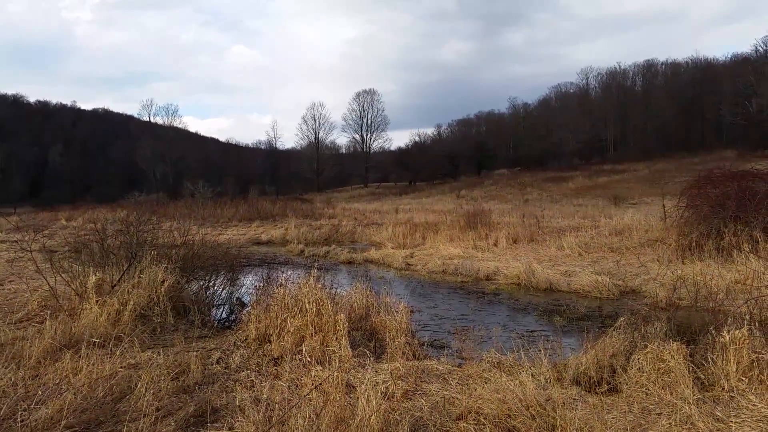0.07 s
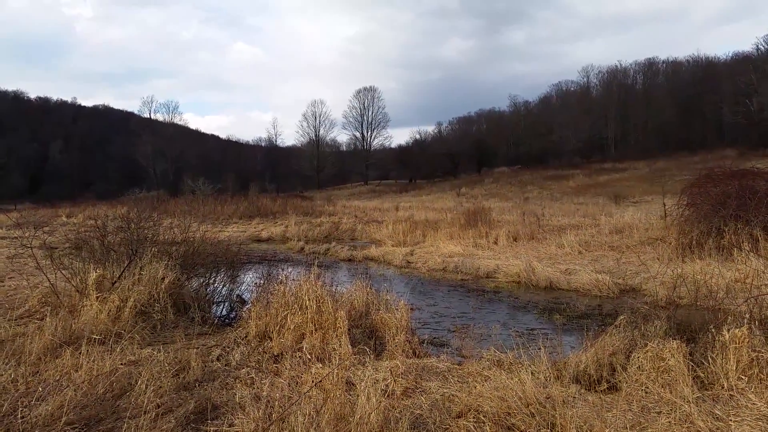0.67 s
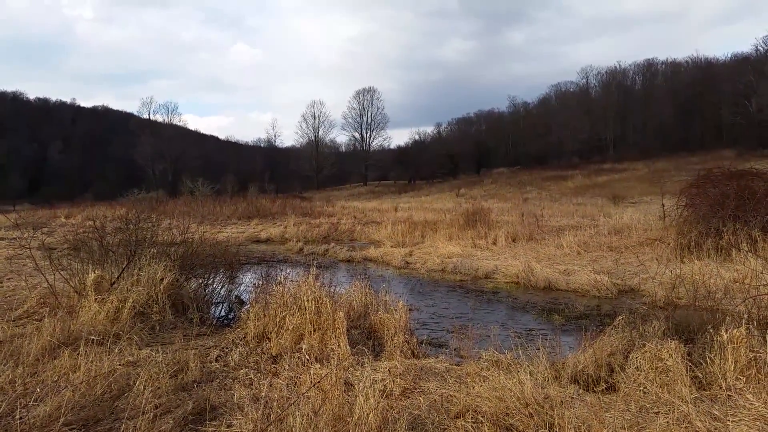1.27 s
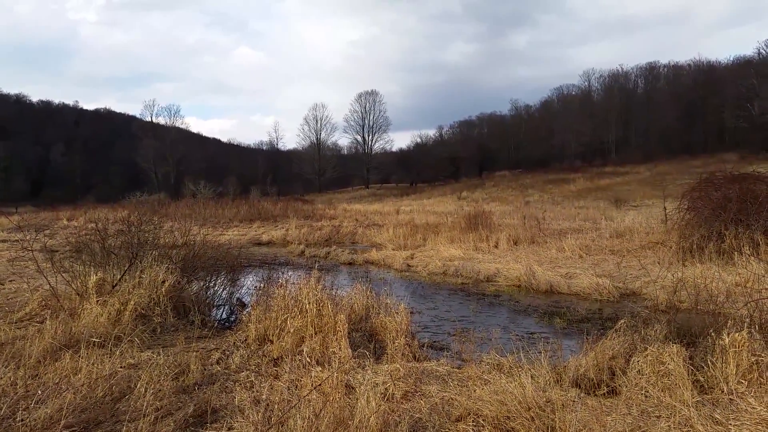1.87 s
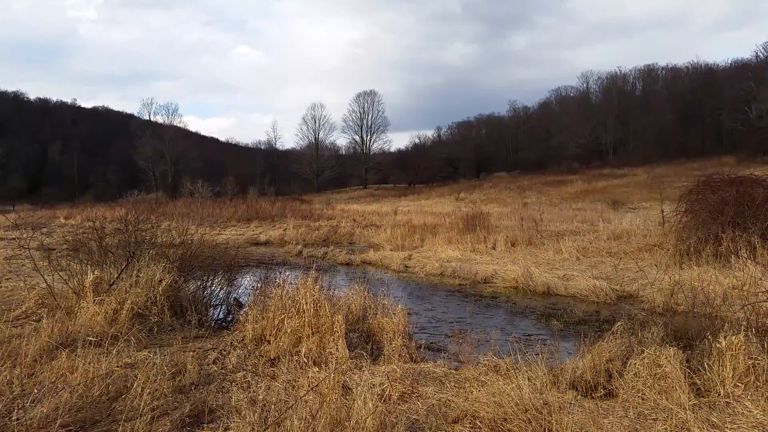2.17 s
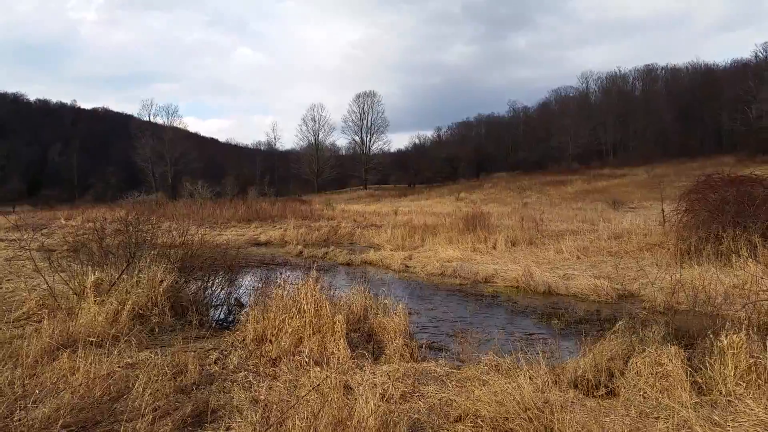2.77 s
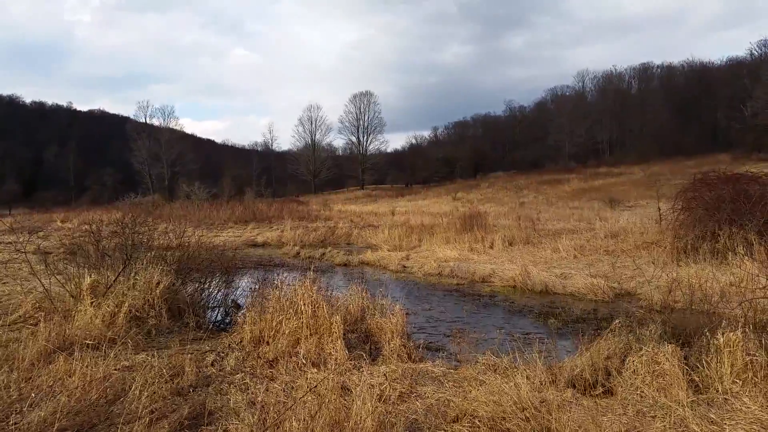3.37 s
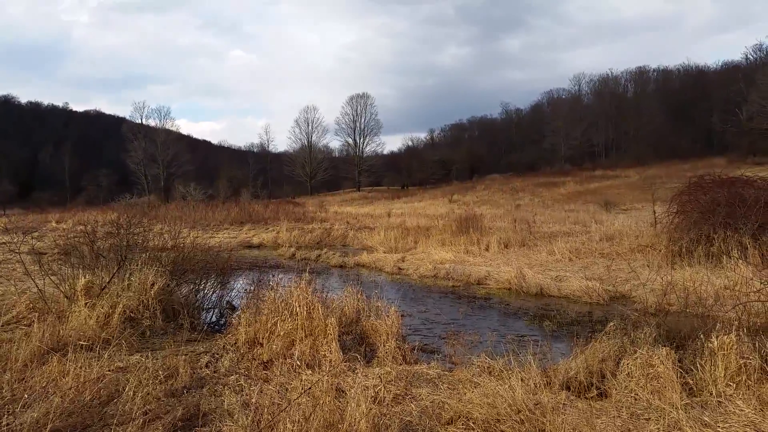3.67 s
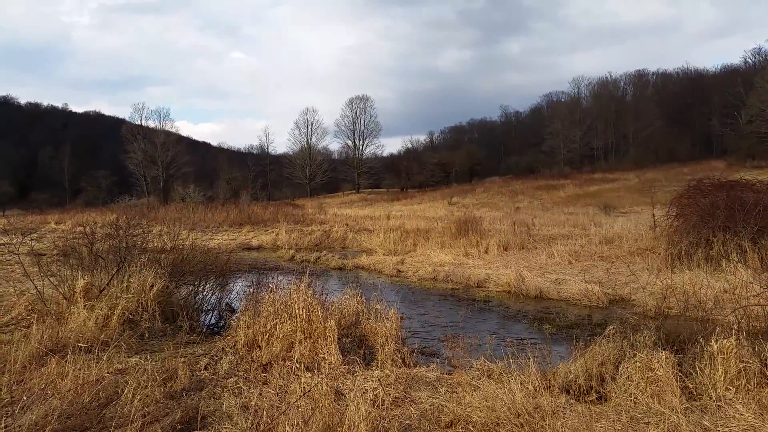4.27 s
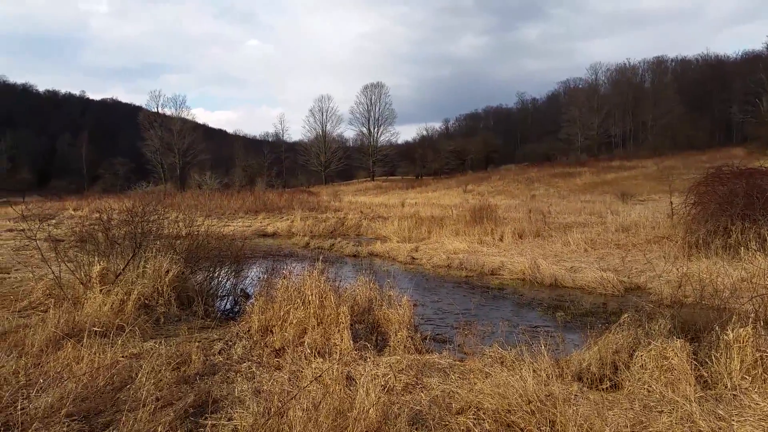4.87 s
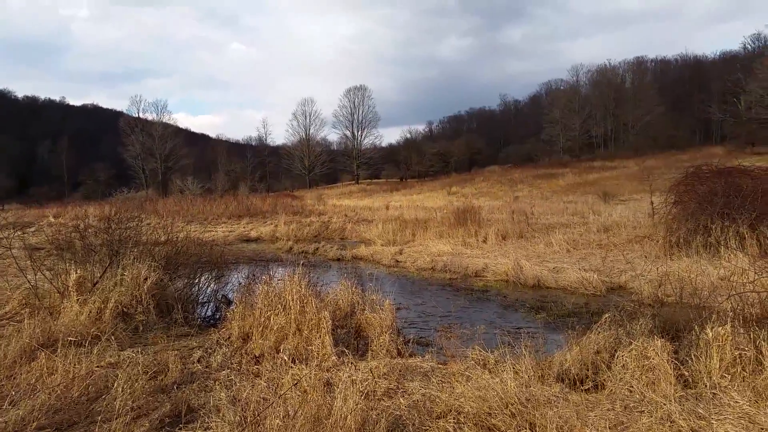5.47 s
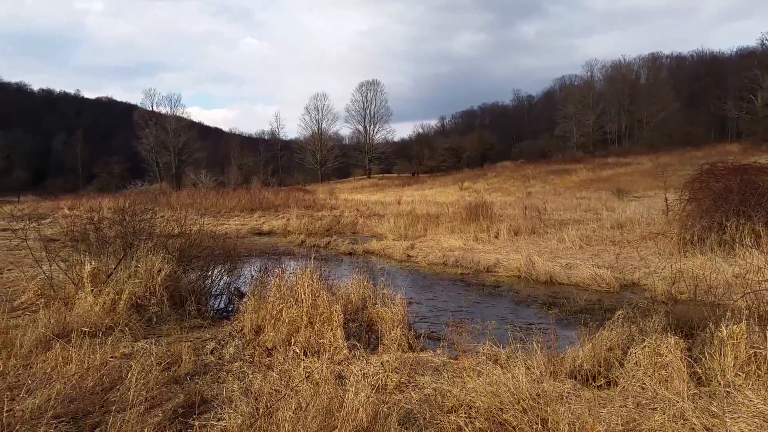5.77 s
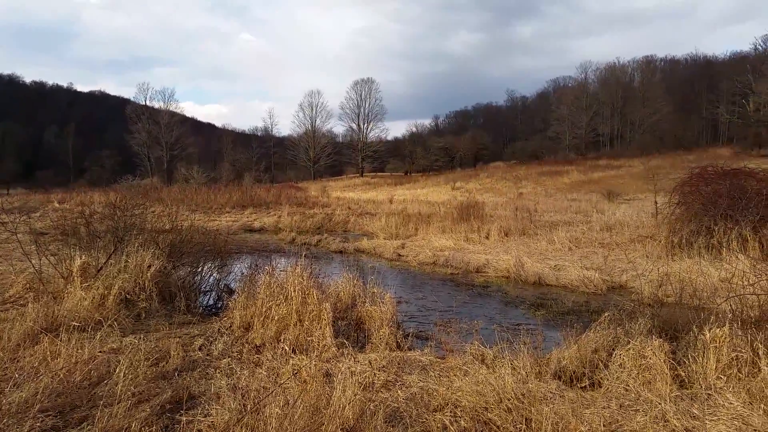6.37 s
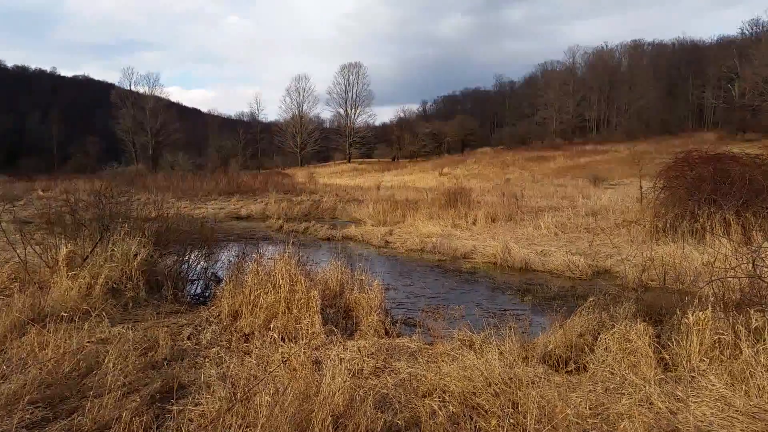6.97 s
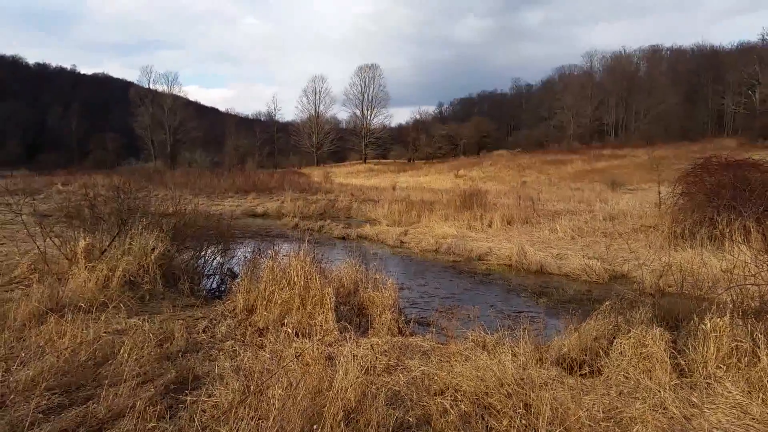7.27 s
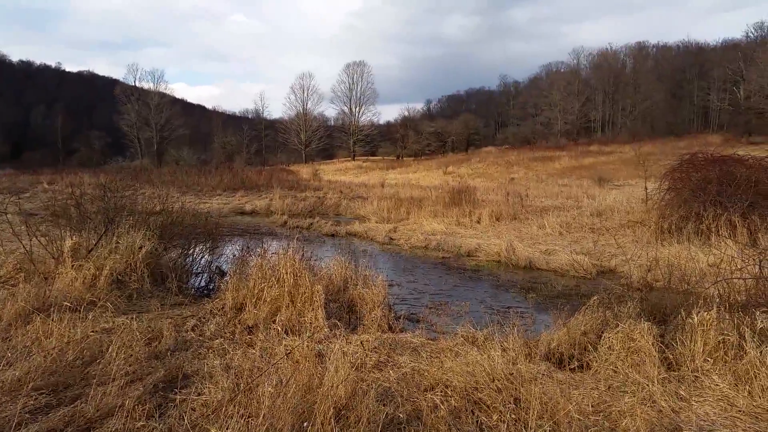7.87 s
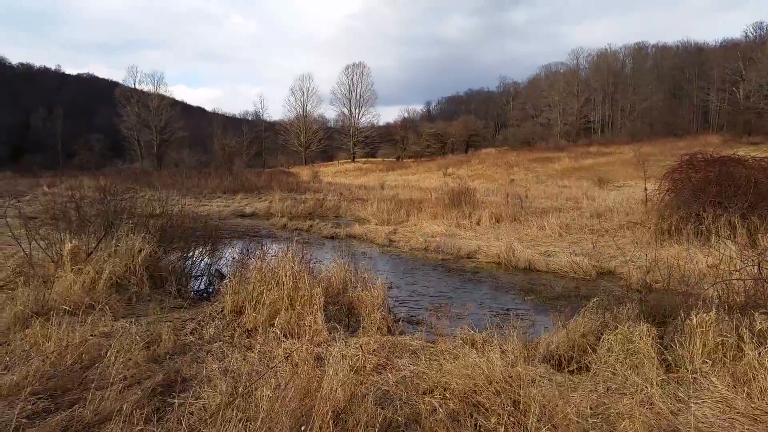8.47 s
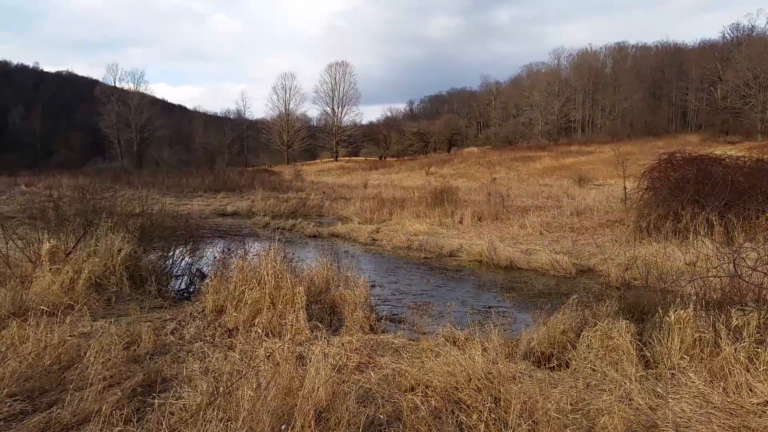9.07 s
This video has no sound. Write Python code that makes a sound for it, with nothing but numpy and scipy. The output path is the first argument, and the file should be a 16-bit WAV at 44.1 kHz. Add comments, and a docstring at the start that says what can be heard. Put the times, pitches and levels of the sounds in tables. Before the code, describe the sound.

Many small frogs call in short, high, rising whistles across a marsh while gusts of wind rumble on the microphone.

```python
"""A chorus of short rising whistles: spring peepers call around a marsh pond, near ones over a far blur.
Each peep is a larynx tone whose second harmonic is radiated by the resonant vocal sac.
One frog peeps lower than the rest, a few trill, and wood frogs quack faintly through throat resonances.
Turbulent wind rumbles on both microphones and buffets the right one; dry grass rustles and ticks."""
import sys
import numpy as np
from scipy import signal
from scipy.fft import rfft, irfft, next_fast_len
from scipy.io import wavfile
from scipy.ndimage import uniform_filter1d

SR = 44100
rng = np.random.default_rng(int(sys.argv[2]) if len(sys.argv) > 2 else 0)


def master(y):
    """Save y as 16-bit WAV."""
    cut = np.clip(np.atleast_2d(y).T, -1, 1)
    pcm = np.round(cut * 32767)  # scale
    wavfile.write(sys.argv[1], SR, pcm.astype(np.int16))


N = 407043
TIME = np.arange(N) / SR


def from_db(db):
    """Decibels to amplitude gain."""
    return 10 ** (np.asarray(db) / 20)


def rms_one(x):
    """Normalisation to an rms of 1."""
    return x / np.sqrt(np.mean(x ** 2) + 1e-20)


def add(out, start, sound):
    """Superposition: a sound joins out at a start time in seconds."""
    at = int(round(start * SR))
    first, last = max(at, 0), min(at + sound.shape[-1], N)
    if last > first:
        out[..., first:last] += sound[..., first - at:last - at]


def wander(rate, samples):
    """Random modulation of spread about 1, with rate new values a second."""
    steps = np.arange(samples) * rate / SR
    count = int(steps[-1]) + 2
    return np.interp(steps, np.arange(count), rng.standard_normal(count))


def pan(left_db):
    """Level difference, left minus right, at constant total power."""
    return rms_one(from_db([[left_db / 2], [-left_db / 2]]))


def noise(colour):
    """Spectral shaping of white noise, uncorrelated in the two channels; rms 1."""
    hz, db = np.transpose(colour)
    size = next_fast_len(N, True)
    gain = from_db(np.interp(np.log(np.fft.rfftfreq(size, 1 / SR) + 1), np.log(hz), db))
    white = rng.standard_normal((2, size))
    return rms_one(irfft(rfft(white) * gain, size)[:, :N])


def band(x, low_hz, high_hz):
    """Butterworth band-pass."""
    return signal.sosfilt(signal.butter(2, [low_hz, high_hz], "band", fs=SR, output="sos"), x)


def progress(length):
    """Normalised time, 0 to 1 through a call."""
    return np.linspace(0, 1, int(length * SR))


def swell(u, attack, release):
    """Envelope with a rounded rise and fall, given as shares of the call; rms 1."""
    ramp = np.clip(np.minimum(u / attack, (1 - u) / release), 0, 1)
    return rms_one(np.sin(np.pi / 2 * ramp))


def surges(rows, attack_s, release_s):
    """Incoherent sources add in power: the gain of events that rise, hold and die away."""
    power = np.zeros(N)
    for start, length, db in rows:
        away = np.maximum((start - TIME) / attack_s, (TIME - start - length) / release_s)
        power += (from_db(db) * np.exp(-np.clip(away, 0, 20))) ** 2
    return np.sqrt(power)


def marsh(x, t60_s, wet_db):
    """Reverberation: reeds and banks scatter sound into a short tail, different at each microphone."""
    t = TIME[:SR]
    tail = rng.standard_normal((2, SR)) * from_db(-60 * t / t60_s) * (t > .003)
    tail /= np.sqrt(np.sum(tail ** 2, axis=1, keepdims=True))
    return x + from_db(wet_db) * signal.fftconvolve(x, tail, axes=1)[:, :N]


def still_air():
    """The ambient noise floor: a steady broadband hush."""
    # spectrum of the hush: frequency_hz, density_db
    air_colour = [(30, 2.5), (300, 4), (600, 4), (1100, 1.5), (1800, -1), (3000, 6), (3500, -6), (4200, -3),
                  (5000, -20), (6400, -38), (8500, -37.5), (12000, -26.5), (16000, -21.5)]
    return from_db(-48) * noise(air_colour) * pan(left_db=2)


def snap(decay_s):
    """An impulsive source: a noise burst with exponential decay."""
    return rng.standard_normal((2, SR // 20)) * np.exp(-TIME[:SR // 20] / decay_s)


def grass():
    """Modulated noise and impulses: dry blades hiss in the breeze and rustle, stems crack and tick."""
    # swishes in the breeze: start_s, length_s, level_db
    swishes = [(4.45, 1.07, -68.5), (6.12, 0.18, -62), (7.07, 0.074, -69), (7.75, 0.3, -70)]
    # their spectrum: frequency_hz, density_db
    grass_colour = [(30, -21.5), (3000, -12.5), (6500, -6), (8500, 3), (12000, 2), (16000, -5)]
    stir = np.hypot(from_db(-72), surges(swishes, attack_s=.04, release_s=.05))
    hiss = stir * noise(grass_colour) * from_db(1.2 * wander(250, N))
    # rustles close on the left: start_s, length_s, level_db
    rustles = [(6.66, 0.028, -45), (6.76, 0.037, -44.5), (7.02, .11, -39), (7.25, .015, -49.5)]
    # their spectrum: frequency_hz, density_db
    rustle_colour = [(30, -8), (200, -7), (400, 0), (750, -14), (2000, -12), (4000, -33), (7000, -56),
                     (16000, -49)]
    crinkle = from_db(2.5 * wander(150, N))
    envelope = surges(rustles, attack_s=.031, release_s=.022)
    rustle = envelope * noise(rustle_colour) * crinkle * pan(left_db=14.5)
    # a stalk cracking in the loudest rustle: start_s, level_db
    stalk = (7.022, -20.5)
    crack = band(band(snap(decay_s=.0021), 250, 1470), 250, 1500)
    add(rustle, stalk[0], from_db(stalk[1]) * crack / np.abs(crack).max() * pan(left_db=13))
    # dry stems ticking: start_s, gain_db
    ticks = [(2.6319, -52), (6.568, -46)]
    for start, db in ticks:
        add(rustle, start, from_db(db) * band(snap(decay_s=.0035), 10000, 16000))
    return hiss + rustle


def wind(brightening, lumps_db):
    """Turbulence rumbles at the microphones; stronger gusts shed smaller eddies, which sound higher."""
    # the breeze, veering from right to left: time_s, left_db, right_db
    breeze = [(0, -44, -41.5), (1.2, -40, -29.5), (2.3, -36.5, -33), (4.6, -31.5, -24), (6.3, -31.5, -21.5),
              (6.801, -23, -23.5), (7.399, -27.5, -32.5), (8.701, -24, -34), (9.23, -31, -48)]
    # spectrum of the rumble: frequency_hz, density_db
    wind_colour = [(20, -18), (45, 0), (80, 4.5), (125, -4.5), (200, -17), (300, -32), (500, -41),
                   (2000, -78.5)]
    # gusts on the right microphone: start_s, length_s, level_db
    gusts = [(.67, .08, -24), (1.17, .17, -20), (1.73, 0.23, -20), (2.53, 0.066, -24), (2.79, .16, -19),
             (3.23, 0.27, -14.5), (3.76, 0.14, -15), (4.03, 0.22, -15), (4.86, 0.35, -15), (5.58, .23, -17),
             (6.29, 0.19, -18.5), (6.69, 0.044, -25.5), (8.43, 0.053, -26.5)]
    # their spectrum: frequency_hz, density_db
    gust_colour = [(20, -20), (50, -3.5), (85, 0.5), (130, 1.5), (200, -10), (300, -22.5), (500, -44.5),
                   (2000, -89)]
    # sharp buffets on the right: time_s, boost_db
    buffets = [(0.676, 11), (1.218, 6), (1.312, 3.5), (1.91, 8.5), (4.889, 6), (5.746, 2.5), (6.332, 6)]
    times, left_db, right_db = np.transpose(breeze)
    left, right = (from_db(np.interp(TIME, times, db)) for db in (left_db, right_db))
    left_flutter, right_flutter = (from_db(1.65 * wander(14, N)) for _ in range(2))
    rumble = left * left_flutter * noise(wind_colour) * from_db([[1], [-10]])  # spills to the right
    flow = right_flutter * np.hypot(right, surges(gusts, attack_s=.06, release_s=.082))
    gust_db = 20 * np.log10(flow) + sum(db * np.exp(-((TIME - s) / .011) ** 2) for s, db in buffets)
    lumps = from_db(lumps_db * np.tanh(wander(60, N)))
    # spectrum of the small eddies: frequency_hz, density_db
    eddy_colour = [(100, 7), (220, .5), (400, -14.5), (700, -33), (1500, -53.5)]
    eddies = rms_one(band(noise(eddy_colour)[0], 144, 900))
    eddy_share = from_db(-6.5 + brightening * np.minimum(gust_db + 16, 5))
    pressure = from_db(gust_db) * rms_one(noise(gust_colour)[0] + eddy_share * eddies * lumps)
    saturated = .75 * np.tanh(pressure / .75)  # the port's air flow saturates in the strongest buffets
    return rumble + saturated * [[0], [1]]


def far_frogs(count, centre_hz, spread_hz, rise_hz, pause_s, overtones_db):
    """Independent sources blur together: frogs of all sizes, each at its own pitch and pace; rms 1."""
    out = np.zeros((2, N))
    for k, (pace, offset, place, stretch) in enumerate(rng.random((count, 4))):
        rank = (k + .5) / count
        hz = centre_hz + spread_hz * np.log(rank / (1 - rank))
        call = peep(.1 + .0604 * stretch, hz - rise_hz / 2, hz + rise_hz / 2,
                    lead_ms=-.35 * place, attack=.1, overtones_db=overtones_db)
        call *= pan(left_db=10 * (place - .5))
        beats = np.arange(20) - 1 + offset + rng.normal(0, .06, 20)
        for start, db in zip(beats * pause_s * (1 + pace / 2), rng.normal(0, 2.6, 20)):
            add(out, start, from_db(db) * call)
    return rms_one(out)


def answering(near, eagerness):
    """Frogs set each other off: the gain of the far chorus follows the power of the near calls."""
    power = uniform_filter1d(np.mean(near ** 2, axis=0), SR // 20)
    return rms_one((power / power.mean() + .18) ** eagerness)


def wood_frogs():
    """Source and filter: six hoarse noise pulses through two throat resonances make a quack."""
    # quacks: time_s, level_db, resonance_hz
    quacks = [(4.652, -49.5, 1070), (4.847, -49.5, 1100), (5.147, -53.5, 1170), (5.294, -53, 1070),
              (5.47, -57, 1150), (6.26, -54, 1030)]
    out = np.zeros(N)
    for time, db, hz in quacks:
        u = progress(.0507)
        rasp = rng.standard_normal(len(u)) * np.sin(np.pi * 6 * u) ** 2
        throat = band(rasp, hz * .896, hz * 1.06) + from_db(-8) * band(rasp, 1560, 2000)
        add(out, time - .015, from_db(db - 1) * rms_one(throat) * swell(u, attack=.35, release=.6))
    return out


def trilling_frogs():
    """Amplitude modulation chops a warning whistle into uneven, rising pulses that grow louder."""
    # trills: start_s, length_s, start_hz, end_hz, pulses_per_s, final_level_db
    trills = [(0.72, 0.46, 1765, 1767, 24, -45.5), (1.759, 0.55, 2080, 2076, 32, -49),
              (4.04, 0.63, 2076, 2166, 44, -47), (4.491, 0.36, 2170, 2380, 30, -44),
              (6.7, 0.6, 1990, 2330, 27, -50.5), (8.329, 0.57, 2250, 2336, 17.5, -45.5),
              (8.7, 0.25, 2330, 2440, 23, -36.5)]
    out = np.zeros((2, N))
    for start, length, start_hz, end_hz, rate, db in trills:
        u = progress(length)
        cycle = (u * length * rate + .12 * wander(rate, len(u))) % 1
        hz = start_hz + (end_hz - start_hz) * u + 150 * (cycle - .5) + 25 * wander(rate, len(u))
        pulses = rms_one(np.sin(np.pi * cycle) ** 4 * from_db(3 * wander(rate, len(u))))
        envelope = from_db(db + 9.1 * (u - 1)) * swell(u, attack=.067, release=.096)
        add(out, start, envelope * pulses * whistle(hz, lead_ms=0))
    return out * pan(left_db=-13)


def low_frog():
    """Frequency modulation: about once a second a lower peep dips, then climbs, growing louder."""
    # low peeps: start_s, length_s, base_pitch_hz, level_db
    low_peeps = [(0.06, 0.19, 2154, -41), (1.026, .18, 2084, -43), (2.087, 0.17, 2067, -41.5),
                 (3.189, 0.17, 2048, -42.5), (4.16, .17, 2103, -41), (5.15, 0.18, 2055, -40.5),
                 (6.048, 0.19, 2050, -39), (6.925, 0.17, 2060, -40), (7.89, 0.19, 2060, -45),
                 (8.8, 0.18, 2080, -44.5)]
    # pitch contour: share_of_call, offset_hz
    glide = [(0, 107.5), (.15, 25.5), (.32, -4), (.6, 56.5), (1, 123.5)]
    share, offset_hz = np.transpose(glide)
    out = np.zeros((2, N))
    for start, length, hz, db in low_peeps:
        u = progress(length)
        tone = whistle(hz + np.interp(u, share, offset_hz), lead_ms=.015)
        envelope = from_db(db + 6.9 * (u - .87)) * swell(u, attack=.14, release=.025)
        add(out, start, envelope * tone)
    return out * pan(left_db=-6.5)


def whistle(hz, lead_ms, overtones_db=0):
    """The vocal sac radiates the larynx's second harmonic; the others emerge near the sac's resonance."""
    # larynx harmonics 1 to 8: ratio_to_whistle, level_db, left_minus_right_db
    partials = [(.5, -29.5, -8.5), (1, -1.5, -0.5), (1.5, -29.5, 2.5), (2, -42, 3), (2.5, -51.5, -1),
                (3, -51, -5), (3.5, -57, -1.5), (4, -49, -6)]
    sac_hz, sac_width_hz = 2770, 170
    lead_s = np.array([[lead_ms], [0]]) / 1000  # earlier arrival at the left microphone
    cycles = np.cumsum(hz) / SR + rng.random() + hz * lead_s
    larynx_phase = (np.pi * cycles).astype(np.float32)  # an octave below the whistle
    resonance = np.exp(-((hz - sac_hz) / sac_width_hz) ** 2 / 2)
    chance_db = 2 * rng.standard_normal(len(partials))
    # the reeds scatter the weaker partials, so they reach the microphones out of step
    scatter = rng.normal(0, 1.3, (len(partials), 2, 1)).astype(np.float32)
    out = 0
    for k, (_, db, left_db) in enumerate(partials):
        strength = 1 if k == 1 else resonance * from_db(chance_db[k] + overtones_db * (k > 1))
        harmonic = np.sin((k + 1) * larynx_phase + scatter[k] * (k != 1))
        out = out + from_db(db) * strength * pan(left_db) * harmonic
    return np.sqrt(2) * out


def peep(length, start_hz, end_hz, lead_ms, attack, overtones_db):
    """Pitch climbs as the frog presses air into its sac; well above resonance the call weakens."""
    u = progress(length)
    climb = u + u * (1 - u) / 8
    waver_hz = 6 * np.interp(u, np.linspace(0, 1, 12), rng.standard_normal(12))
    hz = start_hz + (end_hz - start_hz) * climb + waver_hz
    sac_gain = from_db(-np.maximum(hz - 3100, 0) / 50)
    return rms_one(sac_gain * swell(u, attack, release=.13)) * whistle(hz, lead_ms, overtones_db)


def near_frogs():
    """Level and arrival-time differences place each frog on the bank; its pitch varies a little."""
    # voices, by frog: start_hz, end_hz, length_s, overtones_db, left_minus_right_db, left_lag_ms
    frogs = { "deep": (2430, 2690, 0.17, -4, -2, 0.75), "low": (2509, 2789.5, 0.21, -0.5, -5, 0.4),
             "mellow": (2590, 2830, 0.02, -2.5, -3.5, .25),
             "right bank": (2609, 2870, 0.1553, -5, -10.5, -0.2),
             "quick": (2650, 2961.5, 0.033, -1, -2, -0.63), "bright": (2680, 2990, .115, 3, 1.5, .11),
             "middle": (2739.5, 3040.5, 0.37, -2, 0.5, 0.17), "high": (2810, 3100, .11, 1.3, 1.1, .09),
             "thin": (2889, 3141.5, 0.18, 4, -0.5, -0.17), "shrill": (2950, 3280, .125, -1, 5, -1)}
    # peeps, by frog: start_s, level_db
    peeps = { "deep": [(.329, -33), (1.327, -33), (2.397, -31), (3.69, -31.5), (4.72, -33.5),
             (5.756, -34.5), (6.645, -37), (7.417, -34), (8.29, -39.5), (8.789, -30.5)],
             "low": [(.812, -28.5), (1.17, -30.5), (1.47, -29.5), (2.01, -34.5), (2.58, -31), (3.507, -30),
             (4.42, -31.5), (5.32, -31), (6.189, -29.5), (6.93, -32.5), (8.13, -31), (9.05, -30.5)],
             "mellow": [(.631, -29), (1.21, -34.5), (1.69, -29.5), (2.82, -31.5), (3.645, -29),
             (4.828, -32), (5.87, -30.5), (6.345, -27.5), (6.885, -29.5), (7.91, -29), (8.672, -31)],
             "right bank": [(-.02, -28.5), (.502, -27.5), (1.515, -27.5), (2.26, -28.5), (2.715, -27),
             (3.623, -31.5), (4.54, -30), (5.68, -33.5), (6.005, -27), (6.37, -32.5), (7.025, -33.5),
             (7.425, -26), (8.66, -27)], "quick": [(.135, -29.5), (.925, -27.5), (1.651, -29), (2.343, -32),
             (3.075, -25), (3.39, -35), (3.87, -28), (4.14, -34), (4.56, -32.5), (5.29, -29),
             (6.184, -25.5), (7.616, -29.5), (7.77, -25), (8.414, -32.5), (9.15, -32)],
             "bright": [(.789, -25), (1.806, -26.5), (2.785, -26), (3.925, -27), (5.12, -27.5), (5.85, -24),
             (6.635, -27.5), (7.48, -27.5), (8.24, -27), (8.86, -31)], "middle": [(.745, -28.5),
             (1.265, -33), (1.565, -27), (2.32, -31), (3.235, -34.5), (4.165, -30.5), (4.71, -28),
             (4.975, -27.5), (5.51, -31), (6.92, -29.5), (7.46, -30), (7.8, -26.5), (7.98, -33),
             (9.02, -30)], "high": [(.95, -25.5), (1.985, -26), (2.945, -25.5), (4.44, -25.5),
             (5.365, -28.5), (6.012, -26), (7.05, -37), (7.49, -26.5), (8.27, -30), (8.68, -32.5),
             (9.03, -29)], "thin": [(2.36, -31.5), (3.17, -30), (3.893, -32.5), (4.57, -28), (5.39, -30),
             (6.79, -37.5), (7.645, -36.5), (8.26, -29.5), (9.025, -28.5)], "shrill": [(.19, -41),
             (.35, -40.5), (.66, -38.5), (1.076, -42), (1.8, -40.5), (2.19, -38.5), (2.643, -39.5),
             (3.6, -39), (4.36, -41.5), (4.7, -41.5), (4.95, -39.5), (5.69, -40), (6.97, -40.5),
             (7.16, -42.5), (7.65, -37.5), (8.16, -38.5), (8.53, -38.5)]}
    out = np.zeros((2, N))
    for name, (start_hz, end_hz, length, overtones_db, left_db, lag_ms) in frogs.items():
        for start, db in peeps[name]:
            detune_hz = 7 * rng.standard_normal()
            call = peep(length, start_hz + detune_hz, end_hz + detune_hz,
                        lead_ms=-lag_ms, attack=.077, overtones_db=overtones_db)
            add(out, start, from_db(db) * pan(left_db) * call)
    return out


def scene():
    """Superposition of frogs, air, grass and wind; the farther peepers are more reverberant."""
    near = marsh(near_frogs(), t60_s=.42, wet_db=-18)
    neighbours = far_frogs(16, centre_hz=2767, spread_hz=78, rise_hz=319.8, pause_s=.75, overtones_db=5)
    neighbours = from_db(-37) * marsh(neighbours, t60_s=.18, wet_db=-12.5)
    far = far_frogs(64, centre_hz=2785, spread_hz=52, rise_hz=300, pause_s=.7, overtones_db=-3)
    far = from_db(-31.5) * marsh(far, t60_s=.45, wet_db=-7)
    chorus = (neighbours + far) * answering(near, eagerness=.15)
    low = marsh(low_frog(), t60_s=.092, wet_db=-10.5)
    pulsed = marsh(trilling_frogs() + wood_frogs(), t60_s=.14, wet_db=-5)
    return near + chorus + low + pulsed + still_air() + grass() + wind(brightening=.91, lumps_db=6.5)


def record(dry):
    """The microphone ports resonate in the high treble; a steep low-pass cuts the top."""
    port_hz, cutoff_hz = 11950, 15750
    ring = signal.lfilter(*signal.iirpeak(port_hz, Q=15, fs=SR), dry)
    low_pass = signal.ellip(12, .1, 80, cutoff_hz, fs=SR, output="sos")
    return signal.sosfilt(low_pass, dry + from_db(7) * ring)


dry = scene()
out = record(dry)
master(out)
```